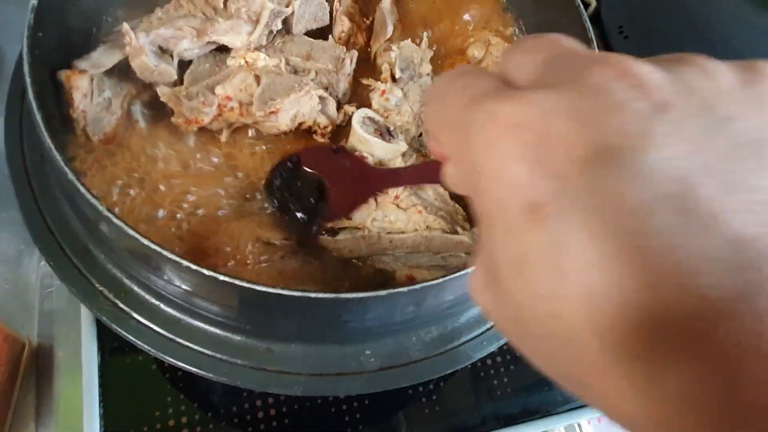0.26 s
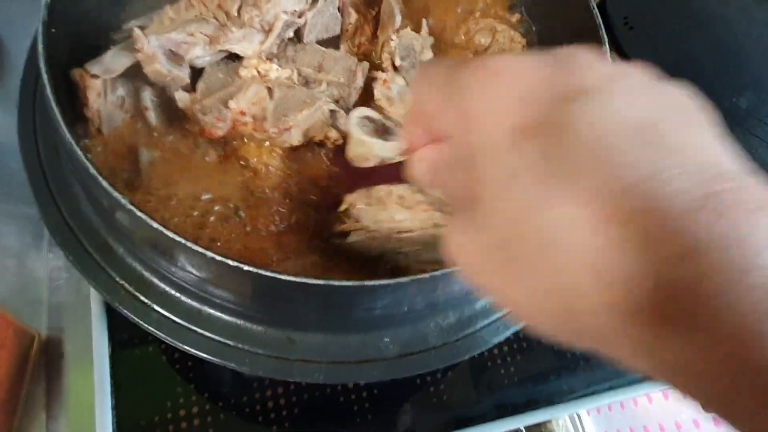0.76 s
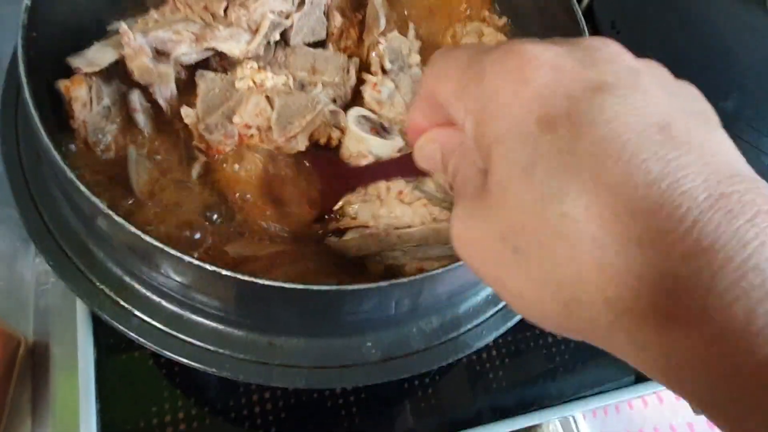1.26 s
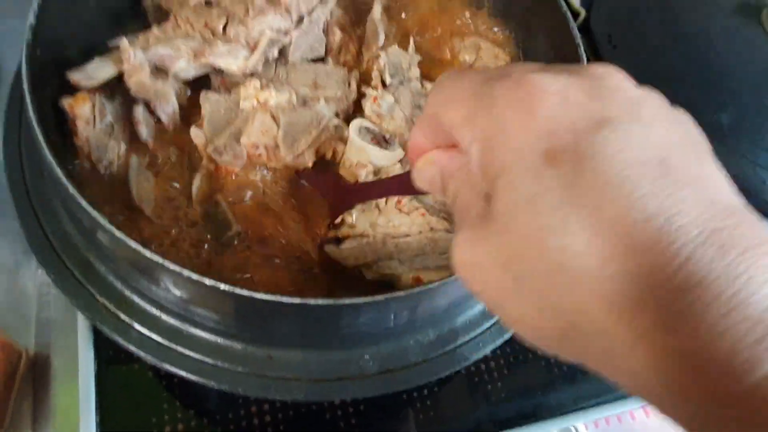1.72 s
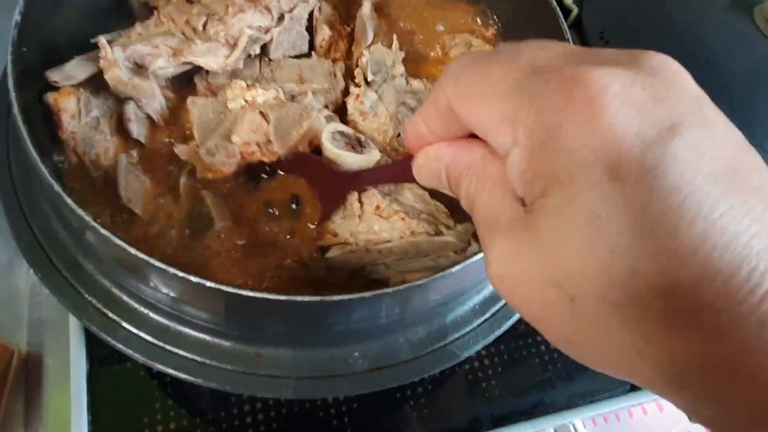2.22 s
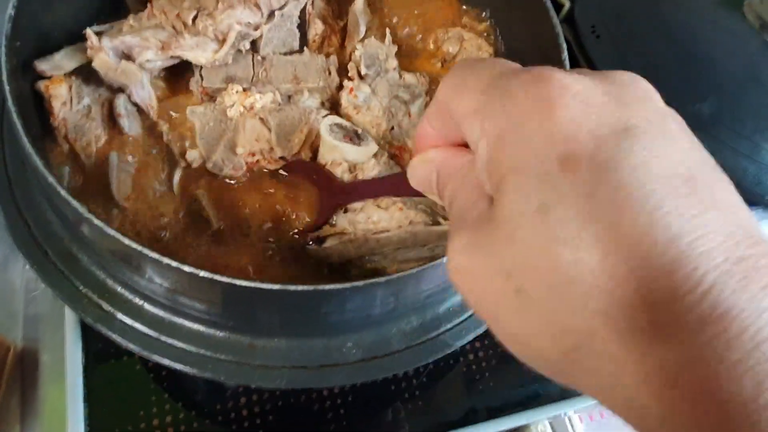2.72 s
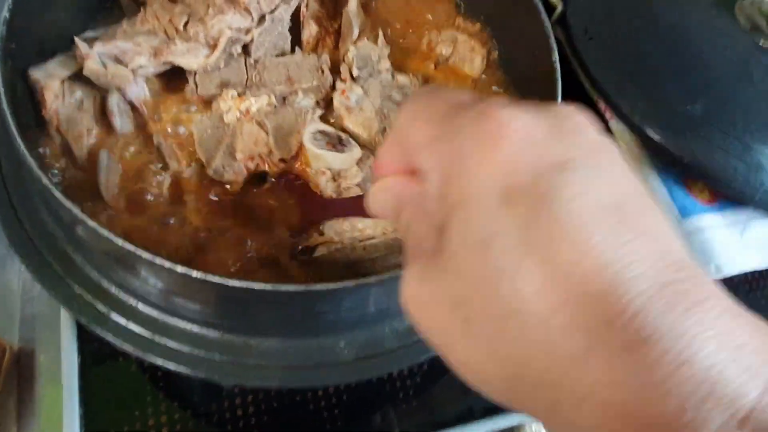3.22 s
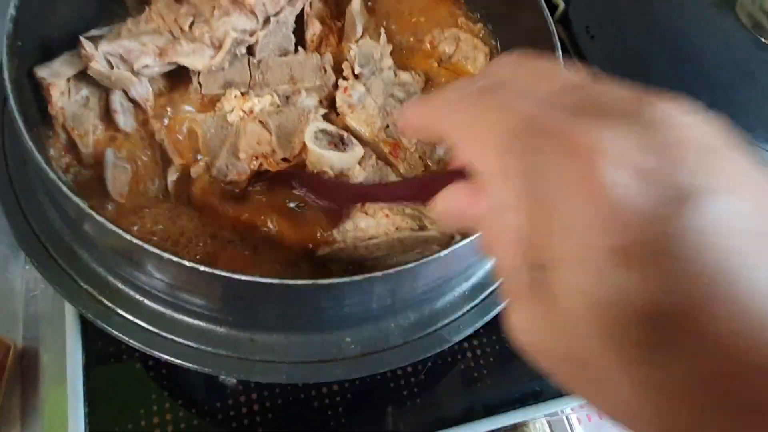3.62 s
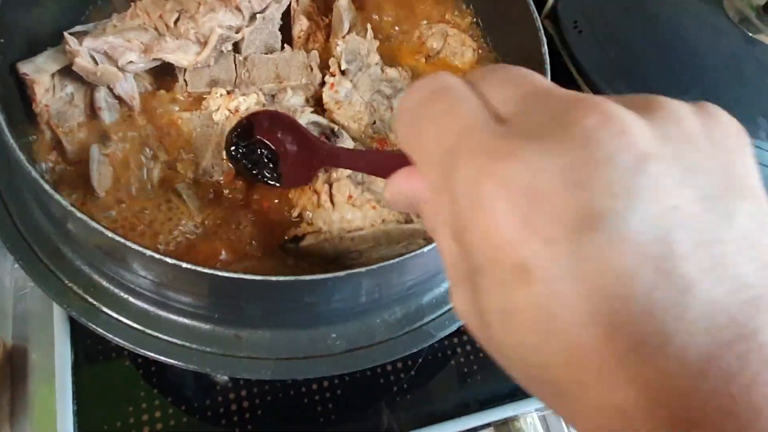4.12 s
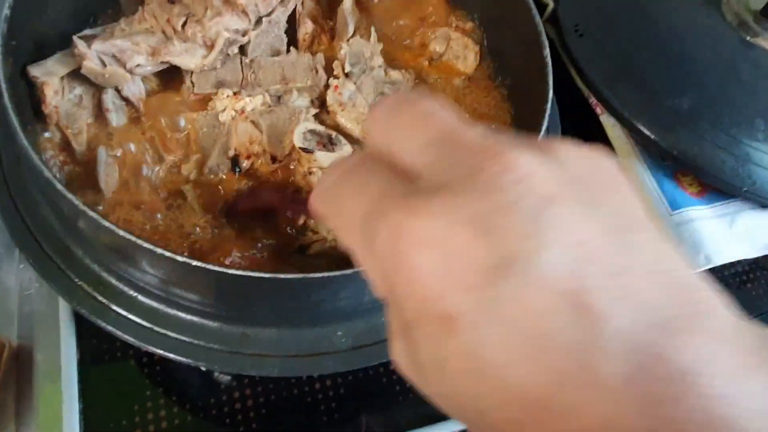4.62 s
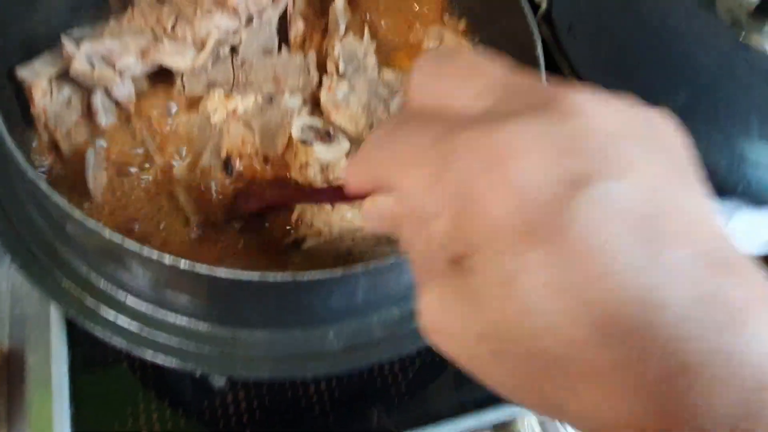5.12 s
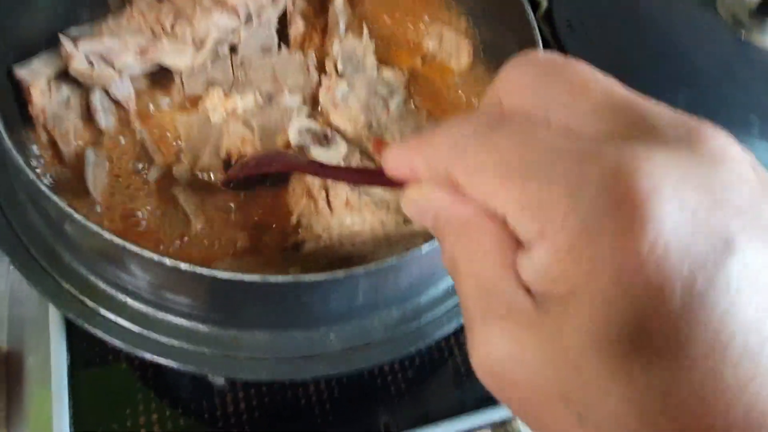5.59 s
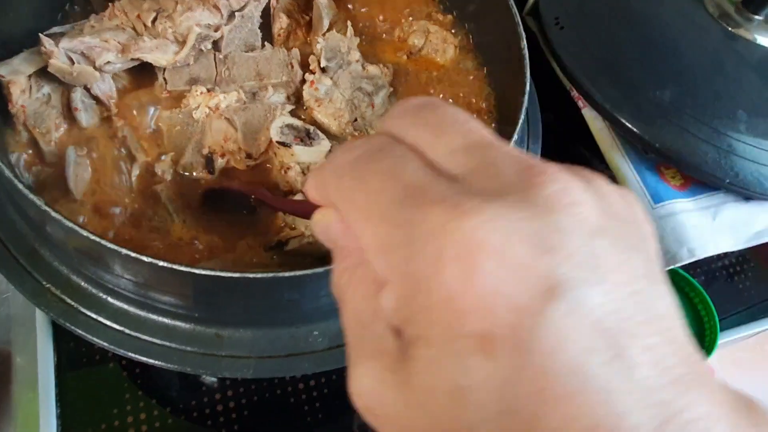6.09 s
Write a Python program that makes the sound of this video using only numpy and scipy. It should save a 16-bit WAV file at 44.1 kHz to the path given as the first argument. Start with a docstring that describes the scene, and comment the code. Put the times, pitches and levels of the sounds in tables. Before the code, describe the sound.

An induction cooktop hums low and steady over the rush of its cooling fan. Above it, broth simmers in a steel pot, plopping thickly in the first second, with soft fizz and small bright spits. A plastic spoon scrapes faintly between bones. The simmer eases, swells with one sharper spit after four seconds, and swells again at the end. Heard in stereo from just above the rim, in a kitchen.

```python
"""Kitchen, a stereo pair just above the rim of a steel pot of bone broth on an induction hob. From the start
the coil makes the pot base hum at twice the mains frequency over the cooling fan's rush. Bubbles plop thickly
in the first second; foam fizzes and spits, and a plastic spoon scrapes faintly between the bones. The simmer
eases until 3.4 s, swells as the spoon splashes into the broth at 4.2 s, and swells once more at the end, just
after 6 s."""
import sys
import numpy as np
from scipy import signal
from scipy.fft import rfft, irfft
from scipy.io import wavfile

SR = 44100
rng = np.random.default_rng(int(sys.argv[2]) if len(sys.argv) > 2 else 0)


def log_audio(samples):
    """Write samples as a 16-bit WAV file to the path given in sys.argv[1]."""
    # one column per channel
    frames = np.atleast_2d(samples).T
    # limit to full scale, then quantise
    limited = np.clip(frames, -1, 1)
    pcm = np.round(limited * 32767).astype(np.int16)
    wavfile.write(sys.argv[1], SR, pcm)


N = 280035
TIME = np.arange(N) / SR
FREQS = np.maximum(np.fft.rfftfreq(N, 1 / SR), 1)


def hum(mains_hz=59.98, sway_db=.1, waver_db=0.97):
    """Magnetic pull shakes the pot base evenly, twice a cycle; weaker lines waver as the broth moves."""
    # lines of the hum: (nominal frequency [Hz], level [dB], left minus right [dB])
    lines = [(60, -42.5, -0.5), (100, -50, -0.5), (120, -16, -1), (140, -54, -2.8), (180, -36.5, 3),
             (220, -59.5, 3.5), (240, -40.5, -3.5), (260, -48, 0.5), (280, -57.5, -4), (300, -42.5, -4),
             (360, -58.5, 12), (380, -65, -0.5), (400, -54.5, -3.5), (420, -61, -12.5), (480, -61.5, -4.5),
             (600, -77, -8.5), (640, -67, -10), (660, -61.5, -3.5), (680, -65.5, -2.5), (720, -61.5, -1.2),
             (2270, -78.5, 0)]
    out = np.zeros((2, N))
    for hz, db, pan_db in lines:
        order = np.round(3 * hz / mains_hz) / 3  # every line sits on a third of the mains frequency
        depth_db = sway_db if order == 2 else waver_db
        tone = np.sqrt(2) * np.sin(2 * np.pi * (order * mains_hz * TIME + rng.random()))
        pan = undb(np.array([[pan_db], [-pan_db]]) / 2)
        out += tone * undb(db + depth_db * walk(1.6)) * pan
    return out


def plops(cycles=0.34, gulp_db=-11, gulp_delay_s=.006, gulp_ratio=.72):
    """Bubbles burst crisply, close to the rim; the broth closes over each with a softer, lower gulp."""
    # the biggest bubbles: (time [s], level [dB], pitch [Hz])
    big_bubbles = [(0.111, -27, 1080), (0.179, -21, 1250), (0.247, -23, 925), (0.315, -23, 900),
                   (0.348, -17.5, 790), (0.737, -20, 820), (0.837, -22.5, 920), (0.863, -20, 937),
                   (1.094, -25, 1016), (1.153, -26, 790), (1.424, -24, 704), (1.675, -25.5, 750),
                   (1.798, -22, 1100), (2.152, -23, 1420), (2.294, -25.5, 770), (2.494, -24, 1030),
                   (2.524, -24, 830), (2.894, -23.5, 810), (3.438, -20.5, 896), (3.963, -24.5, 1294),
                   (4.376, -27, 1050), (4.948, -23.5, 985), (5.244, -25.5, 796), (5.821, -22.5, 1165),
                   (6.268, -26.5, 950)]
    out = np.zeros((2, N))
    for s, db, hz in list(big_bubbles) + by_chance(per_second=7, db=-26.5, hz=820):
        ring, lag = rng.uniform(.6, 1.4, 2)
        burst = undb(db) * bubble(hz, cycles * ring, rise=0.95)
        gulp = undb(db + gulp_db) * bubble(hz * gulp_ratio, cycles)
        add(out, s - .5 / hz, pot(burst, ring_t60=.055, ring_db=-7))
        add(out, s + gulp_delay_s * lag, pot(gulp))
    return out


def simmer(per_second=170, spots=5, centre_hz=850, octaves=.65, cycles=0.94, trim_db=-3, surge_db=2.8):
    """Small bubbles rise in flurries at a few spots of the pot; higher ones are smaller and quieter."""
    # how hard the broth boils: (time [s], relative level [dB])
    boil = [(0, -58), (.3, -45.5), (.9, -49.5), (1.4, -51), (2.6, -52), (3.4, -54.5), (4.2, -47),
            (5.0, -50.5), (5.7, -51), (6.3, -46)]
    out = np.zeros((2, N))
    for _ in range(spots):
        spot = np.zeros(N)
        for when, pitch, size, ring in rng.random((int(per_second * N / SR / spots), 4)):
            ratio = 2 ** (octaves * np.clip(np.log(pitch / (1 - pitch)) / 2, -1, 3))
            gain = undb(4 * min(-np.log(size), 2)) / np.sqrt(max(ratio, 1))
            add(spot, when * N / SR, gain * bubble(centre_hz * ratio, cycles * (1 / 2 + ring)))
        add(out, 0, pot(spot))
    level_db = np.interp(TIME, *np.transpose(boil)) + trim_db + surge_db * walk(17)
    return out / out.std() * undb(level_db)


def spits(attack_s=0.0021, decay_s=0.0017, trim_db=-2):
    """Foam collapses and droplets land in short bright bursts, a few sharp and many slight."""
    # the sharpest spits, with the spoon's splash into the broth at 4.24 s: (time [s], relative level [dB], band
    # centre [Hz])
    sharp = [(0.168, -43, 7450), (0.33, -43, 5750), (1.259, -40.5, 9500), (1.351, -38.5, 7170),
             (1.581, -43.5, 6800), (1.776, -43, 6300), (2.164, -41.5, 9200), (2.894, -40, 6750),
             (3.314, -38, 7100), (4.243, -31.5, 9060), (5.823, -43, 5600), (5.901, -41, 9000)]
    out = np.zeros((2, N))
    t = np.arange(-SR // 50, SR // 25) / SR
    envelope = np.exp(np.where(t < 0, t / attack_s, -t / decay_s))
    for s, db, hz in list(sharp) + by_chance(per_second=3, db=-48, hz=7000):
        add(out, s + t[0], pot(undb(db + trim_db) * crackle(envelope, hz, spread=0.54, grit_db=4)))
    return out


def spoon(touch_s=.028, trim_db=-3.5):
    """The plastic edge sticks and slips along bone and steel; each stroke bites quickly and eases off."""
    # firm strokes: (start [s], length [s], relative level [dB], band centre [Hz])
    strokes = [(0.145, 0.021, -44.5, 3130), (0.177, 0.039, -42.5, 2740), (.295, 0.065, -45, 1720),
               (0.856, 0.016, -39, 1580), (.972, 0.017, -44.5, 2900), (1.767, 0.015, -40.5, 2900),
               (2.147, 0.021, -44.5, 2400), (2.52, 0.036, -44.5, 2500), (2.79, 0.095, -46.5, 2480),
               (4.238, 0.017, -38, 3570), (4.368, 0.031, -44, 1690), (5.298, .025, -46, 3470),
               (6.157, 0.037, -42, 3680)]
    touches = [(s, touch_s, db, hz) for s, db, hz in by_chance(per_second=2, db=-48.5, hz=2280)]
    out = np.zeros((2, N))
    for s, length, db, hz in list(strokes) + touches:
        pressure = np.sin(np.pi * np.linspace(0, 1, int(length * SR)) ** 0.41)
        add(out, s, pot(undb(db + trim_db) * crackle(pressure, hz, spread=0.32, grit_db=9)))
    return out


def foam(per_second=900, level_db=-59.5, flicker_db=1.0, low_cut_hz=2200):
    """Fine foam bursts as a fizz of tiny clicks of uneven size."""
    clicks = (rng.random(N) < per_second / SR) * rng.standard_normal(N)
    clicks *= undb(4 * np.minimum(rng.exponential(size=N), 3))
    fizz = signal.sosfilt(signal.butter(1, low_cut_hz, "high", fs=SR, output="sos"), clicks)
    return pot(fizz / fizz.std() * undb(level_db + flicker_db * walk(27)))[:, :N]


def surface_hiss(flicker_db=1.4):
    """The simmering surface hisses softly, wide across the pair."""
    # spectrum of the hiss: (frequency [Hz], density [dB per Hz])
    spectrum = [(200, -89.5), (500, -84), (1000, -87.5), (1800, -87), (2600, -90), (3500, -94.5),
                (5000, -100), (7000, -101), (12000, -100), (15500, -102)]
    return air(colour(spectrum), likeness=0.029) * undb(flicker_db * walk(24))


def fan():
    """Under the pot, cooling air rushes through the hob and stirs the resonances of its housing."""
    # the low rush: (frequency [Hz], density [dB per Hz])
    rush = [(20, -84), (42, -73.5), (90, -64.5), (122, -60.5), (160, -64.5), (215, -62.5), (285, -69),
            (325, -74.5), (400, -72), (520, -82.5), (900, -91.5), (3000, -115)]
    # resonances of the housing: (frequency [Hz], width [Hz], density [dB per Hz])
    modes = [(599, 41, -74), (660, 84, -73), (823, 78, -76), (1030, 61, -81), (1970, 130, -91.5),
             (2320, 29, -89)]
    housing = np.sqrt(sum(abs(undb(db) * resonance(hz, width) ** 2) ** 2 for hz, width, db in modes))
    return air(colour(rush), likeness=.93) + air(housing, likeness=0.63)


def pot(x, ring_t60=0.092, ring_db=-6, room_t60=0.33, room_db=-12, far_db=-3, lag_samples=17):
    """Sound reaches the left microphone first, rattles between the pot walls and dies in the kitchen."""
    t = np.arange(SR // 3) / SR
    response = np.zeros((2, len(t)))
    for t60, db in (ring_t60, ring_db), (room_t60, room_db):
        # every spot in the pot has its own pattern of echoes
        tail = rng.standard_normal(response.shape) * np.exp(-np.log(1000) * t / t60) * (t > .0012)
        response += undb(db) * tail / np.linalg.norm(tail, axis=1, keepdims=True)
    response[0, 0] += 1
    response[1, lag_samples] += undb(far_db)
    return signal.fftconvolve(x[None], response, axes=1)


def cavity(x):
    """The air between broth and rim resonates and colours the sounds inside the pot."""
    # air resonances: (frequency [Hz], width [Hz], gain [dB])
    modes = [(674, 130, -12), (856, 25, -8.5), (1000, 78, -9), (1330, 36, -13.5), (1470, 200, -9),
             (2040, 66, -4.5), (2900, 95, -18.5)]
    return shape(x, 1 + sum(undb(db) * resonance(hz, width) for hz, width, db in modes))


def bubble(hz, cycles, rise=0.7, glide=0.044):
    """A bubble opens and its cavity swings briefly, rising in pitch; attack and decay count in cycles."""
    turn = np.arange(int(SR / hz * (rise + 6 * cycles))) * hz / SR
    attack = np.sin(np.pi / 2 * np.minimum(turn / rise, 1)) ** 2
    decay = np.exp(-np.maximum(turn - rise, 0) / cycles)
    return -np.sin(2 * np.pi * turn * (1 + glide * (np.minimum(turn, 3) - 2))) * attack * decay


def crackle(envelope, hz, spread, grit_db):
    """A cluster of tiny clicks of uneven size in a band round hz, under an envelope."""
    size = len(envelope)
    clicks = rng.standard_normal(size) * undb(grit_db * np.minimum(rng.exponential(size=size), 5))
    edges = np.minimum([hz / (1 + spread), hz * (1 + spread)], [SR / 3, SR * 4 / 9])
    band = signal.sosfilt(signal.butter(2, edges, "band", fs=SR, output="sos"), clicks)
    return envelope * band / band.std()


def by_chance(per_second, db, hz, scatter_db=1.5, scatter_octaves=0.68, calm_db_per_s=1.05):
    """Lesser events, weakening as the stirring settles the broth: (time [s], level [dB], pitch [Hz])."""
    when, size, pitch = rng.random((int(per_second * N / SR), 3)).T
    s = when * N / SR
    levels = db + scatter_db * (2 * size - 1) - calm_db_per_s * (s - TIME.mean())
    return list(zip(s, levels, hz * 2 ** (scatter_octaves * (2 * pitch - 1))))


def air(response, likeness):
    """Stereo noise with the given density per Hz; likeness 1 is the same in both channels."""
    mid, side = rng.standard_normal((2, N)) * np.sqrt(SR / 4)
    noise = np.sqrt(1 + likeness) * mid + np.sqrt(1 - likeness) * side * np.array([[1], [-1]])
    return shape(noise, response)


def walk(rate_hz):
    """Smooth random drift with a spread of 1."""
    drift = shape(rng.standard_normal(N), np.exp(-(FREQS / rate_hz) ** 2))
    return drift / drift.std()


def undb(db):
    """Decibels to gain."""
    return 10 ** (np.asarray(db) / 20)


def colour(points):
    """Gain at every frequency from points (frequency [Hz], level [dB])."""
    hz, db = np.transpose(points)
    return undb(np.interp(np.log(FREQS), np.log(hz), db))


def resonance(hz, width_hz):
    """Response of one resonance, gain 1 at its centre."""
    return 1 / (1 + 1j * (FREQS ** 2 - hz ** 2) / (FREQS * width_hz))


def shape(x, response):
    """Filter a sound by a frequency response."""
    return irfft(rfft(x) * response, N)


def add(track, s, sound):
    """Mix a sound into a track at time s."""
    start = int(np.clip(s * SR, 0, N - 1))
    track[..., start:start + sound.shape[-1]] += sound[..., :N - start]


def scene():
    """At the rim: the hob from below, broth and spoon through the air of the pot."""
    hiss = surface_hiss()
    hob = hum() + fan()
    return hob + cavity(hiss + simmer() + plops() + foam() + spits() + spoon())


def record(dry, top_hz=15500):
    """Each microphone port colours the sound in its own way; the top is cut."""
    # response of the two ports: (frequency [Hz], left gain [dB], right gain [dB])
    ports = [(386, -0.5, 0), (630, 2.5, 3.5), (1200, 3.5, 0.5), (2400, -0.5, 0), (4370, 1, 0),
             (7630, -2, -3.5), (8770, 3.5, -4), (10000, -1, -7), (12000, 3.5, -2.5), (15100, 0.5, -8.5)]
    left, right = colour(np.array(ports)[:, [0, 1]]), colour(np.array(ports)[:, [0, 2]])
    heard = shape(dry, np.array([left, right]))
    return signal.sosfilt(signal.ellip(10, .1, 80, top_hz, fs=SR, output="sos"), heard)


dry = scene()
out = record(dry)
log_audio(out)
```